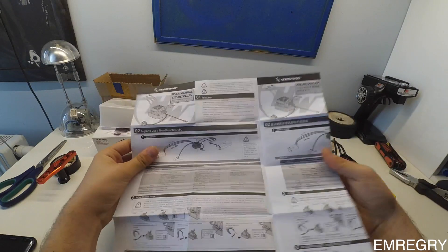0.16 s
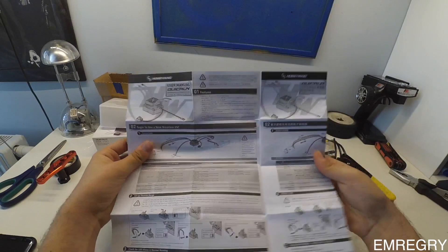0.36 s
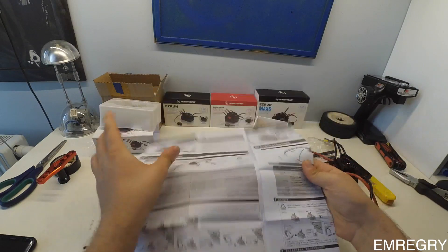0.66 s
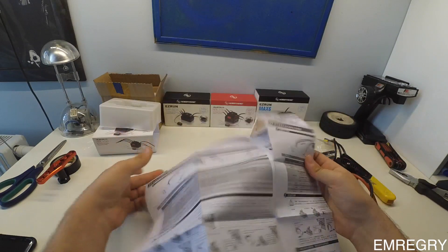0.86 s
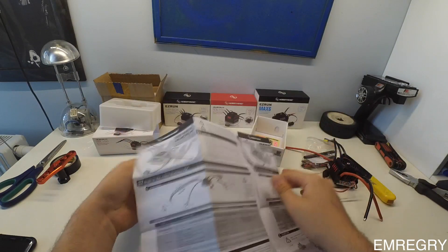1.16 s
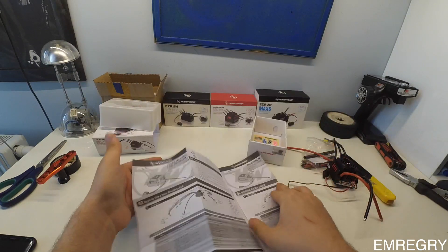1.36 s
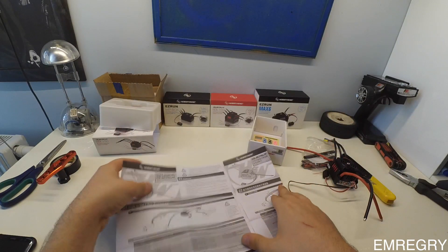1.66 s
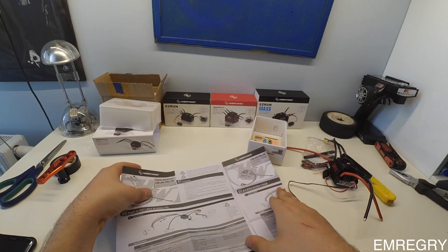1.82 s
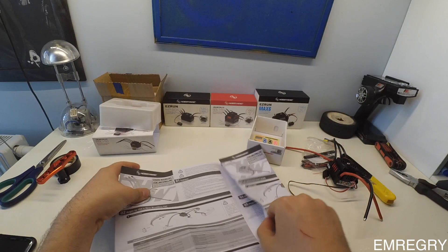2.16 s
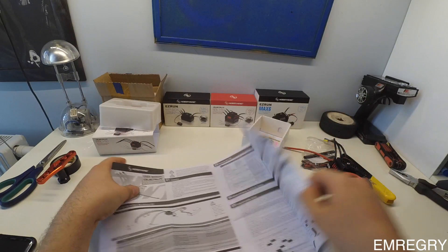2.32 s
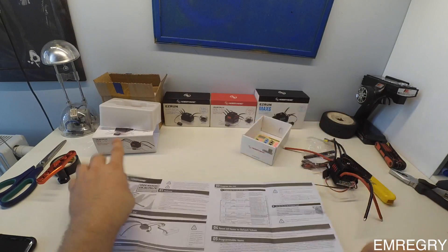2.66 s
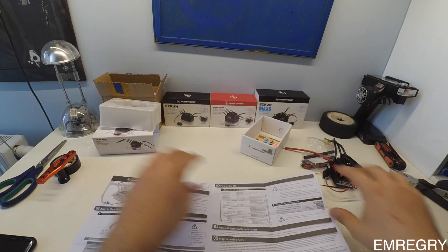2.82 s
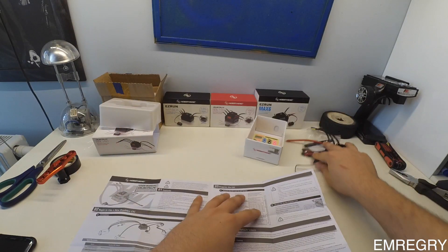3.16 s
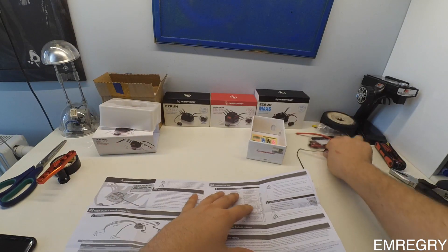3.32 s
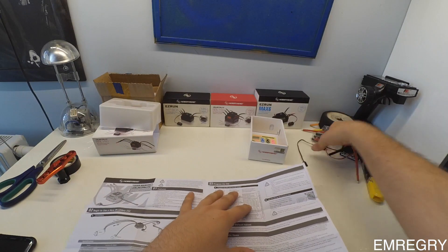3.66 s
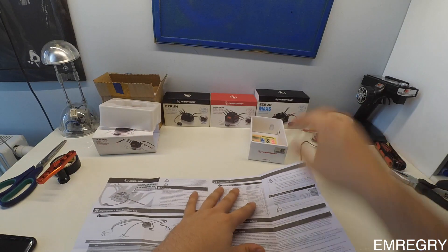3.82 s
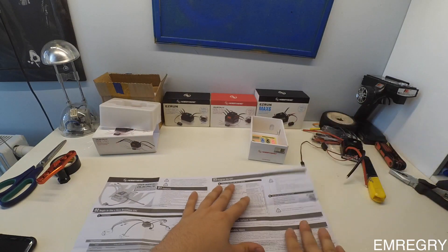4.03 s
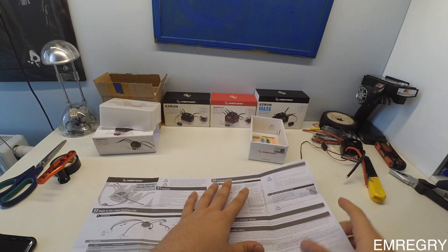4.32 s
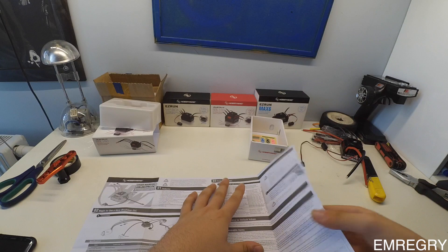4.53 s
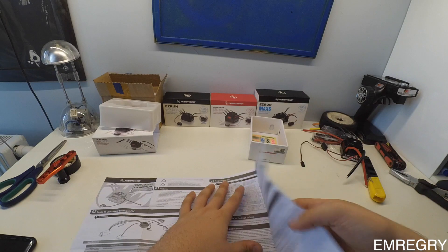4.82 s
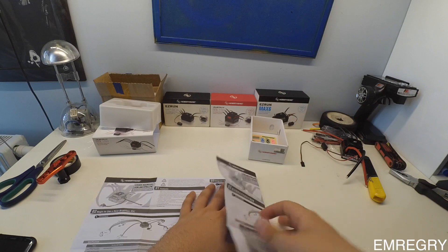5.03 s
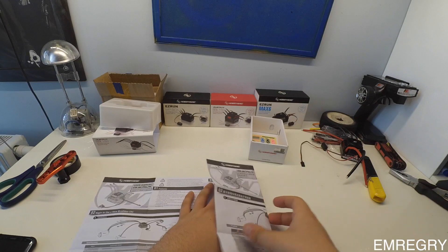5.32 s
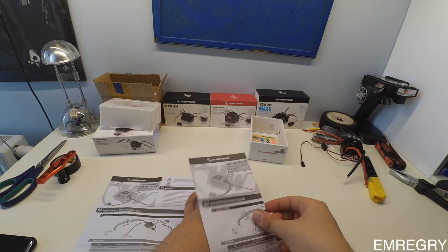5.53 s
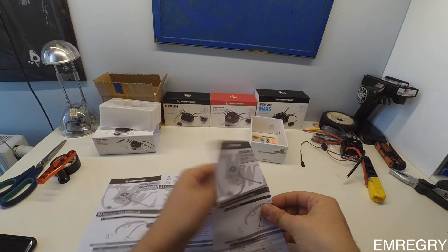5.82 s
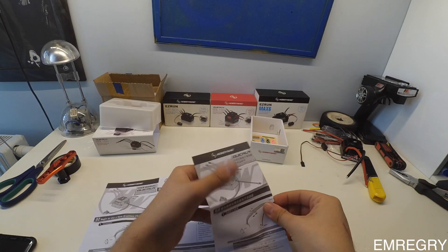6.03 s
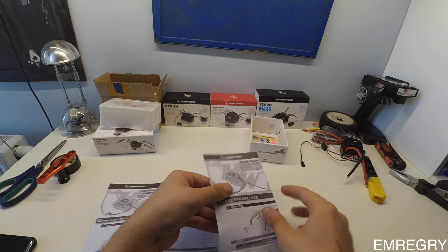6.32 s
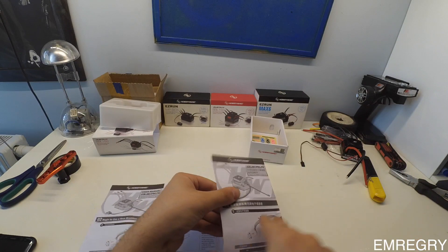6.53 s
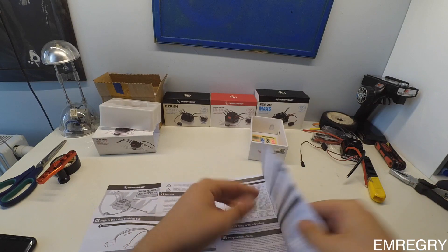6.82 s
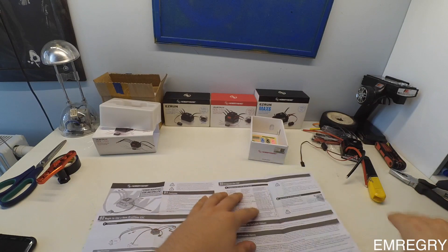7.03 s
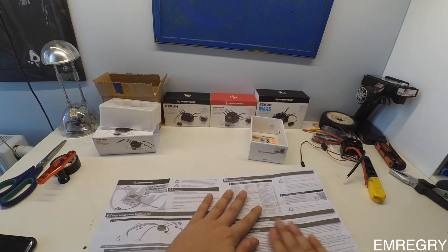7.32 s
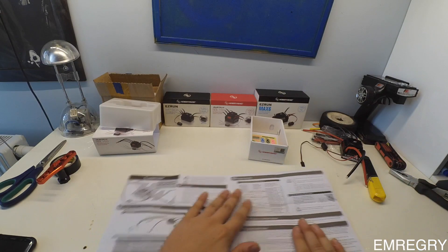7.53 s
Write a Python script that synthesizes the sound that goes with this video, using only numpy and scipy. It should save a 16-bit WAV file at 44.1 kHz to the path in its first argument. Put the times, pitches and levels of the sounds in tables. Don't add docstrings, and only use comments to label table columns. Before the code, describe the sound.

A large paper sheet is unfolded with sharp crackles and flaps, smoothed on a desk, then folded again in a small quiet room.

```python
import sys
import numpy as np
from scipy import signal
from scipy.fft import rfft, irfft
from scipy.io import wavfile
from scipy.ndimage import uniform_filter1d

SR = 44100
rng = np.random.default_rng(int(sys.argv[2]) if len(sys.argv) > 2 else 0)


def undo_db(level):
    steps = np.asarray(level, float) / 20
    return 10 ** steps


def pcm_store(signal):
    levels = np.round(np.clip(np.atleast_2d(signal), -1, 1) * 32767)
    wavfile.write(sys.argv[1], SR, levels.astype(np.int16).T)


N = 338247

# (frequency [Hz], density [dB per Hz])
HUM_SPECTRUM = [(8, 8.5), (25, 0), (36, -12), (52, 5), (80, -14), (125, -8), (200, -23), (300, -40.5)]
# (frequency [Hz], density [dB per Hz])
AIR_SPECTRUM = [(88, -45), (150, -17), (431, -13), (790, 17), (2220, -11), (3420, -20), (7470, -30),
                (16000, -27)]
HUM_LEVEL_DB, AIR_LEVEL_DB = -47, -70
# (frequency [Hz], t60 [s])
ROOM_T60 = [(250, 0.31), (800, 0.28), (2500, 0.28), (8000, 0.17)]
# (peak time [s], level [dB], swell [s], fade [s])
CHANNEL_SPLITS = [
    (.93, -43, 0.023, 0.028),
    (2.203, -57, .004, .01),
]

# (time [s], peak [dB], pitch [Hz], t60 [s])
HAND_THUDS = [(1.014, -24.5, 212, 0.11), (1.384, -39, 255, 0.068), (2.32, -30.5, 125, 0.16),
              (2.635, -26.5, 123, 0.064), (2.996, -32.5, 43, 0.23), (4.07, -29, 114, 0.085),
              (4.371, -30.5, 44.7, 0.17), (4.628, -26, 114, 0.21), (5.948, -28, 39, 0.12),
              (6.957, -33, 59, 0.15), (7.017, -24, 57, 0.066), (7.292, -27.5, 47.5, 0.41)]
# (time [s], peak [dB], pitch [Hz], t60 [s])
DESK_KNOCKS = [
    (4.597, -25.5, 289, 0.071),
    (4.711, -28, 273, 0.09),
    (4.848, -34, 178, 0.14),
    (4.945, -31, 283, 0.073),
    (5.06, -34, 297, 0.088),
    (5.481, -27.5, 296, 0.092),
    (5.702, -45, 292, 0.089),
    (6.711, -40, 110, 0.087),
    (7.289, -30, 121, 0.2),
]
# (time [s], peak [dB], pitch [Hz], t60 [s])
OBJECT_BUMPS = [
    (3.205, -31.5, 477, 0.14),
    (3.301, -40, 322, 0.15),
    (3.382, -21, 513, 0.053),
    (3.385, -31.5, 300, 0.098),
    (3.464, -49, 431, .06),
    (3.515, -44, 495, .08),
    (3.576, -38, 496, .08),
    (3.597, -38, 696, 0.12),
    (3.64, -36, 494, 0.12),
    (3.685, -51, 470, .07),
]
# (time [s], level [dB])
DRAG_LEVEL = [
    (2.99, -79),
    (3.02, -43.5),
    (3.07, -65),
    (3.2, -65),
    (3.22, -43),
    (3.3, -53),
    (3.39, -42.5),
    (3.68, -50),
    (3.8, -62),
]
DRAG_HZ = 472

# (resonance [Hz], width [Hz], level [dB])
PALM_GAP = [(3030, 65, -9), (3610, 100, -1), (4590, 88, -1), (8160, 65, -16)]
# (peak time [s], level [dB], swell [s], fade [s])
PALM_WIPES = [
    (4.25, -47, 0.35, 0.41),
]

# (frequency [Hz], density [dB per Hz])
RUB_SPECTRUM = [(500, -40), (1000, -8), (2000, -6), (3600, -4), (5000, -2.5), (8000, -8.5), (12000, -25),
                (16000, -25)]
# (frequency [Hz], density [dB per Hz])
FLEX_SPECTRUM = [(150, -31), (320, -2), (600, -5.5), (900, -2), (1500, -6), (3000, -11), (6000, -15),
                 (12000, -45.5)]
# (frequency [Hz], density [dB per Hz])
FINE_SPECTRUM = [(3000, -30), (5500, -6), (8000, 0), (11000, -4), (15500, -10)]
# (frequency [Hz], density [dB per Hz])
PUSH_SPECTRUM = [(41, -22), (70, 0.5), (307, 0), (413, -11), (450, -10), (580, -7), (990, -120)]
# (peak time [s], level [dB], swell [s], fade [s])
SLIDE_STROKES = [(.11, -53.5, 0.25, 0.37), (.23, -60.5, .1, 0.047), (.67, -47, 0.09, 0.091),
                 (1.02, -44.5, 0.15, 0.18), (1.21, -53, 0.16, 0.23), (1.39, -48.5, 0.53, 0.25),
                 (1.6, -49, 0.11, 0.085), (1.69, -41.5, 0.096, 0.2), (1.8, -56.5, .1, 0.49),
                 (1.97, -41, 0.079, 0.093), (2.22, -49, 0.37, 0.18), (2.41, -46.5, 0.29, .1),
                 (2.53, -49, 0.3, 0.25), (2.7, -43, 0.53, 0.17), (3.1, -41, 0.29, 0.59),
                 (3.23, -39, 0.15, 0.63), (3.55, -50, 0.71, 0.85), (3.84, -46.5, 0.53, 0.15),
                 (4.04, -58, .012, 0.34), (4.24, -45, 0.34, 0.53), (4.73, -42.5, 0.14, 0.2),
                 (4.94, -43, 0.23, 0.081), (5.31, -55.5, 0.08, .15), (5.41, -48, .03, .12),
                 (5.51, -41.5, 0.21, 0.22), (5.8, -42, 0.31, 0.47), (5.88, -38, 0.19, 0.087),
                 (6.39, -54, 2.7, 0.3), (6.61, -51.5, 0.17, 0.21), (6.72, -51.5, 0.17, 0.49),
                 (7.03, -46, 0.28, 0.33), (7.3, -31, 0.028, 0.12), (7.635, -39.5, 0.31, 0.26)]
# (peak time [s], level [dB], swell [s], fade [s])
BEND_STROKES = [(0.0, -42.5, .1, 0.16), (.67, -45.5, 0.082, 0.28), (.86, -47.5, 0.048, .3),
                (.93, -25.5, .04, 0.059), (1.04, -39.5, 0.087, 0.42), (1.22, -32.5, 0.041, 0.069),
                (1.39, -33, 0.069, 0.16), (1.6, -54, 0.046, 0.29), (1.69, -45, 0.11, 0.11),
                (2.02, -61, 0.043, 0.056), (2.36, -53.5, 0.36, 0.18), (2.53, -32, 0.12, 0.12),
                (2.7, -45.5, 0.27, 0.13), (3.1, -47.5, 0.24, 0.56), (4.06, -46, 0.0098, 0.2),
                (4.46, -52.5, 0.41, 0.2), (4.73, -40.5, 0.15, 0.13), (4.87, -48, 0.049, .2),
                (4.94, -42, 0.13, 0.21), (5.06, -58, 0.066, 0.1), (5.51, -42.5, 0.028, 0.1),
                (5.72, -45.5, 0.065, 0.29), (5.88, -48.5, 0.083, 0.72), (6.39, -51, 0.34, 0.5),
                (6.72, -46, 0.063, 0.29), (7.03, -37.5, 0.14, 0.04), (7.3, -40, 0.018, 0.11)]
# (peak time [s], level [dB], swell [s], fade [s])
BRUSH_STROKES = [(.31, -67, 0.02, 0.03), (.515, -56, .01, 0.028), (.55, -52, .04, 0.05),
                 (.665, -49, 0.032, 0.046), (.745, -53, 0.045, 0.086), (4.52, -72, 0.057, 0.037),
                 (6.34, -62, .04, .05), (6.375, -58, .04, 0.029), (6.70, -57, .04, 0.067),
                 (7.14, -55, 0.023, 0.46), (7.45, -49, 0.23, 0.085), (2.79, -58, .02, 0.066),
                 (3.4, -51, 0.089, 0.16)]
# (time [s], fine hiss over the rub [dB])
SKIN_HISS = [(0.0, -5), (.4, 4), (.9, -4.5), (1.25, -5), (1.55, -2), (1.9, -10), (2.4, -3.5), (2.8, -6.5),
             (3.6, -6.5), (4.2, -7), (4.9, -10), (5.45, -14), (5.85, -4.5), (6.1, -4.5), (6.95, -4.5),
             (7.2, -16), (7.32, -21), (7.45, -12), (7.67, 2.5)]
STROKE_CURVE = 1.185
STROKE_SPAN_DB = 33.5
REST_RUB_DB, REST_FLEX_DB = -70.5, -64

# (frequency [Hz], density [dB per Hz])
CRACK_SPECTRUM = [(150, -14.5), (500, -11), (1100, -2.5), (2000, -2), (3500, 2.5), (8000, -6),
                  (12000, -26.5), (16000, -34)]
# (time [s], crack [dB], brightness [dB per octave], build-up [s])
OPENING_CRACKS = [(0.104, -46, -4, 0.0022), (0.519, -48, -4.5, 0.0015), (0.616, -38.5, -8.5, 0.0051),
                  (0.736, -34, -9, 0.00028), (0.906, -49, -11, 0.00042), (0.919, -26, -5.5, 0.0015),
                  (.932, -17, -3.5, 0.0016), (1.047, -35, -1, 0.0069), (1.091, -40, -8, 0.0015),
                  (1.21, -23, -6.5, 0.00075), (1.216, -25, -7.5, 0.004), (1.345, -19.5, -6.5, 0.0011),
                  (1.387, -39, -17, 0.0049), (1.474, -46, -0.5, .021), (1.744, -23, -4.5, 0.00034),
                  (1.605, -40, -6.5, 0.0042), (1.971, -37, 3, 0.0071), (2.113, -35, -1.5, 0.00036),
                  (2.203, -27, -2, 0.00061), (2.466, -42, -4, 0.0003), (2.497, -25, 2.5, 0.00039),
                  (2.518, -28, -3, .00035), (2.539, -18.5, -3, .0006), (3.067, -35, 14, 0.0032),
                  (3.124, -33, -2.5, 0.0066), (3.537, -39, 13, 0.0018), (.839, -26, -6.5, 0.0013),
                  (1.1, -28.5, -2.5, 0.0036), (1.337, -32.5, -11, 0.0045), (3.671, -40, 24, .0005)]
# (time [s], crack [dB], brightness [dB per octave], build-up [s])
FOLDING_CRACKS = [(4.066, -40, 11, .0004), (4.092, -40.5, 6.5, 0.0076), (4.373, -43.5, 6, .002),
                  (4.647, -40.5, -9.5, 0.018), (4.669, -31, -2, 0.00033), (4.728, -27.5, -3.5, 0.0056),
                  (4.981, -39, -20, 0.0057), (5.067, -43, -14, 0.017), (5.243, -52, -3.5, .0057),
                  (5.39, -23.5, -3.5, 0.0005), (5.452, -32, -12, 0.0023), (5.489, -17.5, -1.5, 0.00038),
                  (5.667, -21, -7.5, 0.00048), (5.681, -21.5, -6, 0.0016), (5.711, -16, -2.5, 0.00072),
                  (6.215, -36.5, -2, 0.0004), (6.38, -30.5, -10.5, 0.00067), (6.413, -40.5, 4, .0005),
                  (6.477, -37, 3.5, 0.00027), (6.499, -44.5, -8, .0005), (6.596, -37.5, 2.5, 0.0018),
                  (6.61, -38, -7, 0.00048), (6.708, -38, -5.5, .0012), (6.971, -27.5, -3.5, 0.0011),
                  (7.018, -32.5, -6, 0.0016), (4.713, -20.5, 2, 0.00062), (4.85, -44.5, -11, .0005)]
# (time [s], crack [dB], brightness [dB per octave], build-up [s])
SMALL_TICKS = [(0.272, -58, -21, 0.00059), (0.349, -57.5, -5, .0005), (0.397, -61, -8, .001),
               (0.455, -59, -3, .002), (.606, -47, 0.5, .001), (.640, -42, -11, 0.00089),
               (0.696, -34, -7.5, .001), (.911, -27, -6, 0.0004), (.923, -36, -9, 0.0011),
               (1.2, -41, 5, .0004), (1.386, -28, -11, .0006), (1.397, -46, -7, 0.0009),
               (1.627, -43, -22, 0.0018), (1.865, -50, -4.5, .0005), (1.885, -52, 0, .0005),
               (1.996, -47, -8, .002), (2.022, -46.5, -12, 0.0031), (4.032, -48.5, 5, 0.00019),
               (4.585, -47, 6, 0.00047), (4.612, -47, 0, .0005), (4.634, -44.5, 5, .002),
               (5.689, -31, -8, 0.0022), (5.727, -32, -3, .003), (5.745, -31, -5, 0.0033),
               (5.903, -36, -7.5, 0.00092), (5.955, -38, 1, 0.00044), (6.367, -43, 0, .0005),
               (6.598, -42, -13.5, .001), (6.636, -45, -7.5, .0003), (6.720, -34, 2.5, .0005),
               (6.868, -54, -11, .0004), (7.565, -38, 18, .0003), (7.575, -46, 9, .0003),
               (7.583, -49, 14, 0.00027), (.012, -44, -4, .004), (.046, -48, -2, .002),
               (.834, -37, -12, .0002), (.945, -30.5, -9, 0.0015), (2.531, -34, -3, .0005),
               (2.547, -25.5, -5, 0.0012), (4.72, -21, -4, 0.00061), (4.91, -48, -9.5, 0.0018),
               (5.235, -57.5, 6, .0003), (5.37, -51, -3, 0.0016), (5.463, -39, -11, .001),
               (5.545, -40, -9, 0.0022)]
# (time [s], crack [dB], brightness [dB per octave], build-up [s])
WIRE_TICKS = [(2.776, -46, 5, .0004), (2.915, -50, 5, .0005), (2.978, -45.5, 12, .0004),
              (2.995, -45, 4, .001), (3.333, -47, 11, .0005), (3.381, -39, 7, 0.0009),
              (3.4, -45, 2, 0.0018), (3.527, -44, 5, .0004), (3.622, -45, 18, .0004), (3.7, -51, 3, .0004),
              (3.708, -50, 18, .0004)]
# (time [s], crack [dB], panel pitch [Hz], build-up [s])
RINGING_CRACKS = [(.684, -40.5, 1010, 0.004), (1.103, -27.5, 590, 0.007), (1.378, -33.5, 1070, 0.00037),
                  (1.402, -26.5, 613, 0.0059), (1.529, -49.5, 1780, .0039), (1.691, -34, 1140, 0.0019),
                  (1.701, -35, 1110, 0.0082), (2.671, -26.5, 3830, 0.002), (3.041, -44, 4440, .0013),
                  (3.092, -28.5, 2450, 0.00053), (3.299, -37, 6780, .00066), (3.488, -39, 6800, 0.00041),
                  (3.639, -41, 6600, 0.00098), (4.033, -49.5, 1720, 0.00029), (4.451, -38, 2115, 0.00097),
                  (4.586, -44, 774, .0004), (4.603, -41.5, 1820, 0.0011), (4.941, -33.5, 5200, 0.0062),
                  (5.026, -35.5, 1280, 0.00022), (5.582, -36.5, 910, 0.00055), (5.773, -25, 2870, 0.001),
                  (5.805, -40.5, 960, 0.018), (5.863, -36, 850, 0.00032), (5.894, -34.5, 780, 0.0016),
                  (5.96, -33, 2190, 0.0024), (6.249, -34, 1650, 0.00047), (6.312, -44, 6460, 0.003),
                  (6.282, -31.5, 910, 0.00029), (7.295, -26, 1350, 0.0005), (7.303, -31, 1400, 0.0013)]
# (time [s], crack [dB], panel pitch [Hz], build-up [s])
PANEL_FLIPS = [(.141, -54, 870, 0.018), (.777, -46.5, 845, 0.00035), (.802, -49, 750, .0004),
               (.896, -43, 635, 0.0014), (1.008, -29, 4340, 0.00034), (1.015, -26, 620, 0.0021),
               (1.016, -20, 3000, 0.0029), (1.15, -44.5, 616, 0.011), (1.2, -39, 614, 0.00041),
               (1.665, -38.5, 920, 0.00055), (1.736, -34, 1780, 0.0016), (2.713, -43, 3080, 0.013),
               (3.216, -27, 3550, 0.001), (3.26, -62, 3300, 0.01), (3.1, -52, 860, 0.011),
               (3.933, -60.5, 2680, .0015), (4.397, -47, 1820, 0.0086), (5.628, -44, 1130, 0.00034),
               (5.926, -41, 1610, 0.0028), (6.627, -46, 850, 0.00055), (6.721, -40, 940, 0.00072),
               (7.356, -46, 2600, .0017), (1.045, -41, 620, .01), (1.24, -42.5, 590, 0.0087),
               (1.43, -42, 650, 0.0061), (2.21, -47.5, 560, .003), (.145, -55, 375, 0.012),
               (4.885, -51, 890, .001), (4.965, -53, 790, 0.00082), (4.982, -54, 1100, 0.0011),
               (5.843, -44, 890, .002), (6.0, -55, 1490, .002)]
DRY_RING_DB, EVEN_RING_DB, FLIP_RING_DB = -8, 2.5, 9.5
FACET_HZ, BRIGHTER_DB_PER_OCT = 3510, 4.5


def evened(x):
    return x / np.sqrt(np.mean(x ** 2) + 1e-20)


def shaped(noise, envelope):
    return evened(noise * envelope) * np.sqrt(np.mean(envelope ** 2))


def read(points, hz):
    f, value = np.transpose(points)
    return np.interp(np.log(hz + 1), np.log(f + 1), value)


def played(rows):
    s, *columns = np.transpose(rows)
    return [np.interp(np.arange(N) / SR, s, c) for c in columns]


def add(mix, s, sound):
    part = mix[round(s * SR):][:len(sound)]
    part += sound[:len(part)]


def strokes(rows, rest_db):
    t = np.arange(0, N, 64) / SR
    power = undo_db(rest_db) ** 2
    for s, db, swell, fade in rows:
        away = np.maximum((s - t) / max(swell, 0.01), (t - s) / max(fade, 0.01))
        power = power + undo_db(db - STROKE_SPAN_DB * away ** STROKE_CURVE) ** 2
    return np.interp(np.arange(N) / SR, t, 10 * np.log10(power))


def resonate(x, hz, width_hz):
    turn = np.exp(2j * np.pi * np.cumsum(hz * np.ones(len(x))) / SR)
    r = np.exp(-np.pi * width_hz / SR)
    return 2 * (turn * signal.lfilter([1 - r], [1, -r], x / turn)).real


def coloured(x, points):
    hz = abs(np.fft.fftfreq(4096, 1 / SR))
    log_gain = np.log(undo_db(np.maximum(read(points, hz), -100)))
    taps = np.fft.ifft(np.exp(np.conj(signal.hilbert(log_gain)))).real[:2048]
    return signal.oaconvolve(x, taps[None] if x.ndim > 1 else taps, axes=-1)[..., :x.shape[-1]]


def grainy(spread_db, clump_db, clump_s):
    clumps = evened(uniform_filter1d(rng.standard_normal(N), max(round(clump_s * SR), 1)))
    size_db = spread_db * np.minimum(rng.exponential(1, N), 6) + clump_db * clumps
    return rng.standard_normal(N) * undo_db(size_db)


def patchy(x, patchy_db, size=256, count=7):
    z = signal.stft(x, nperseg=size)[2]
    patches = uniform_filter1d(rng.standard_normal(z.shape), size=4, axis=0)
    patches = uniform_filter1d(patches, size=count, axis=1)
    return evened(signal.istft(z * undo_db(patchy_db * evened(patches)), nperseg=size)[1][:N])


def building_hum():
    return undo_db(HUM_LEVEL_DB) * evened(coloured(rng.standard_normal((2, N)), HUM_SPECTRUM))


def room_air():
    return undo_db(AIR_LEVEL_DB) * patchy(coloured(rng.standard_normal(N), AIR_SPECTRUM), 5)


def room():
    taps = np.zeros(SR // 2)
    at = np.arange(200, len(taps) - 20, 20)
    taps[at + rng.integers(0, 20, len(at))] = rng.choice([-1., 1.], len(at))
    hz, t, z = signal.stft(taps, SR, nperseg=256)
    decay = undo_db(-60 * t / read(ROOM_T60, hz)[:, None])
    tail = signal.istft(z * decay, SR, nperseg=256)[1]
    return tail / np.linalg.norm(tail)


def channel_difference(hum):
    split = evened(coloured(rng.standard_normal(N), RUB_SPECTRUM))
    return undo_db(-22) * hum + undo_db(strokes(CHANNEL_SPLITS, -140)) * split


def thuds():
    t, out = np.arange(SR // 2) / SR, np.zeros(N)
    for s, db, hz, t60 in [*HAND_THUDS, *DESK_KNOCKS, *OBJECT_BUMPS]:
        tone = np.sin(2 * np.pi * hz * t) + 0.3 * np.sin(2 * np.pi * 1.43 * hz * t)
        soft_onset = 1 - np.exp(-t / 0.0058)
        add(out, s, undo_db(db - 60 * t / max(t60, 0.02)) * tone * soft_onset)
    return out


def drag():
    t = np.arange(N) / SR
    moving = (t > DRAG_LEVEL[0][0]) & (t < DRAG_LEVEL[-1][0])
    slips = grainy(3.5, 4.5, 0.012)
    hollow = evened(resonate(resonate(slips, DRAG_HZ, 120), DRAG_HZ, 400))
    return undo_db(played(DRAG_LEVEL)[0]) * moving * hollow


def wipe():
    skin = grainy(1.5, 1.2, 0.006)
    gap = sum(undo_db(db) * resonate(skin, hz, max(width_hz, 150)) for hz, width_hz, db in PALM_GAP)
    return undo_db(strokes(PALM_WIPES, -120)) * evened(gap)


def pops(per_s):
    t, out = np.arange(600) / SR, np.zeros(N)
    for hz in np.geomspace(750, 7000, 10):
        size = undo_db(4.0 * np.minimum(rng.exponential(1, N), 4))
        flips = (rng.random(N) < per_s / 10 / SR) * size
        ring = np.sin(2 * np.pi * hz * t) * np.exp(-hz * t / 7.7) * np.sqrt(1000 / hz)
        out += signal.oaconvolve(flips, ring)[:N]
    return evened(out)


def rustle():
    rub_db = strokes(SLIDE_STROKES, REST_RUB_DB)
    flex_db = strokes(BEND_STROKES, REST_FLEX_DB)
    fine_gain = undo_db(rub_db + played(SKIN_HISS)[0]) + undo_db(strokes(BRUSH_STROKES, -120))
    rub = patchy(coloured(grainy(2.0, 1.6, 0.006), RUB_SPECTRUM), 2.2, count=50)
    flex = patchy(coloured(grainy(4.3, 3.5, 0.006), FLEX_SPECTRUM), 3.0) + 0.55 * pops(per_s=260)
    fine = patchy(coloured(grainy(1.5, 1.2, 0.005), FINE_SPECTRUM), 1.2)
    push = evened(coloured(grainy(2.5, 3.0, 0.03), PUSH_SPECTRUM))
    return undo_db(rub_db) * rub + fine_gain * fine + undo_db(flex_db) * flex + undo_db(0.57 * flex_db - 22.5) * push


def creases():
    folds = []
    for s, db, tilt_db, build_s in [*OPENING_CRACKS, *FOLDING_CRACKS, *SMALL_TICKS, *WIRE_TICKS]:
        panel_hz = FACET_HZ * 2 ** (np.clip(tilt_db, -12, 8) / 4.5)
        folds.append((s, db, tilt_db, DRY_RING_DB, panel_hz, build_s))
    for rows, ring_db in ((RINGING_CRACKS, EVEN_RING_DB), (PANEL_FLIPS, FLIP_RING_DB)):
        for s, db, panel_hz, build_s in rows:
            tilt_db = BRIGHTER_DB_PER_OCT * max(np.log2(panel_hz / FACET_HZ), -1.3)
            folds.append((s, db, tilt_db, ring_db, panel_hz, build_s))
    return folds


def snap(tilt_db, ring_db, panel_hz, build_s, lead_s, noises):
    crack_noise, panel_noise, size, jerk = noises
    t = np.arange(len(size)) / SR - lead_s
    after = np.maximum(t, 0)
    hz = np.fft.rfftfreq(len(t), 1 / SR)
    build_s = max(build_s, 1e-4)
    slips = undo_db(1.2 * np.minimum(size ** 2, 8))
    t60 = 0.032 + 0.74 * build_s
    stutter = evened(uniform_filter1d(jerk, size=40))
    rise_db = np.minimum(8 * t / build_s, 0) + 4.3 * np.tanh(abs(t) * 250) * stutter
    rise = undo_db(rise_db) * (t > -3.0 * build_s)

    octaves = np.log2(np.clip(hz, 1000, 7500 if tilt_db < 0 else 16000) / 2500)
    colour = undo_db(read(CRACK_SPECTRUM, hz) + tilt_db * octaves)
    crack_decay = undo_db(-60 * after / (t60 - 0.0011 * tilt_db))
    crack = shaped(irfft(rfft(crack_noise * slips) * colour), rise * crack_decay)

    width_hz = 110 + panel_hz ** 2 / 9000
    ring_t60 = t60 + 16.7 / panel_hz
    swing = undo_db(ring_db - 4.5 - 60 * np.maximum(t - 0.002, 0) / ring_t60)
    ring = resonate(resonate(panel_noise * slips, panel_hz, width_hz), panel_hz, 2 * width_hz)
    return crack + shaped(ring, rise * swing)


def snaps():
    lead_s, out = 0.035, np.zeros(N)
    for s, db, tilt_db, ring_db, panel_hz, build_s in creases():
        noises = rng.standard_normal((4, 4096))
        sound = snap(tilt_db, ring_db, panel_hz, build_s, lead_s, noises)
        add(out, s - lead_s - 0.001, undo_db(db + 2.0) * sound)
    return out


def scene():
    hum = building_hum()
    side = channel_difference(hum[1])
    close = rustle() + drag() + wipe() + snaps()
    reverb = undo_db(-12.5) * signal.fftconvolve(close, room())[:N]
    mono = close + reverb + thuds() + hum[0] + room_air()
    return np.array([mono + side, mono - side])


def low_pass(x):
    return signal.sosfilt(signal.butter(12, 16390, fs=SR, output="sos"), x)


def record(dry):
    edge = signal.firwin(255, 15300, window=("kaiser", 9), fs=SR)
    mix = signal.oaconvolve(dry, edge[None], "same") - 0.002
    return low_pass(mix)


dry = scene()
out = record(dry)
pcm_store(out)
```